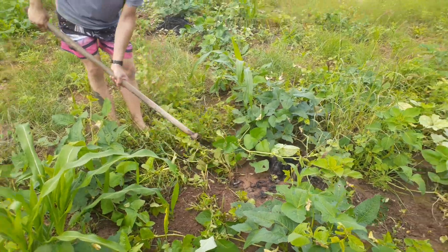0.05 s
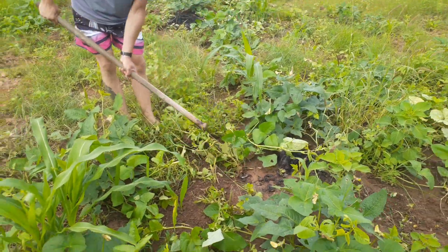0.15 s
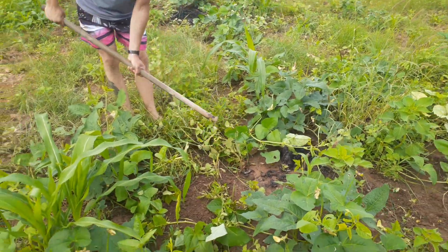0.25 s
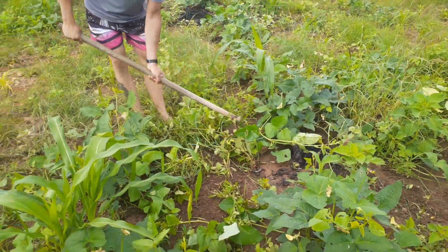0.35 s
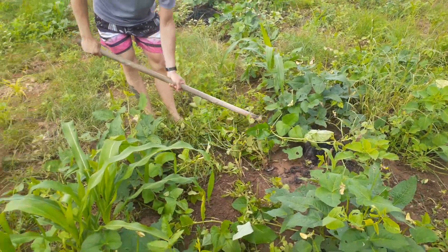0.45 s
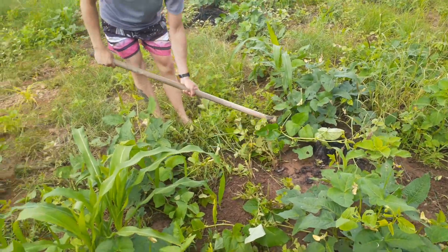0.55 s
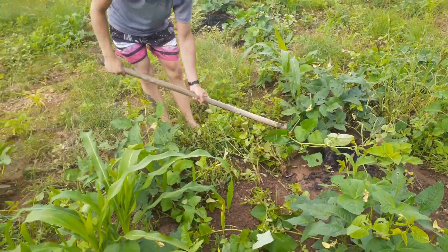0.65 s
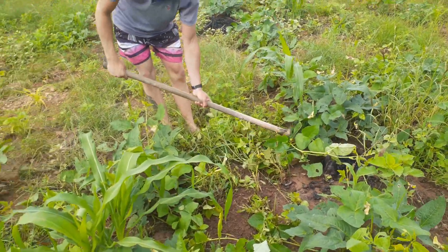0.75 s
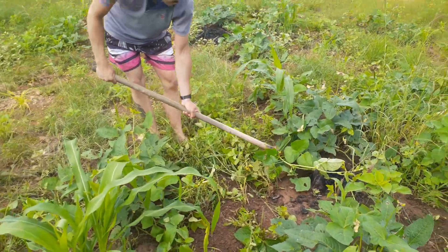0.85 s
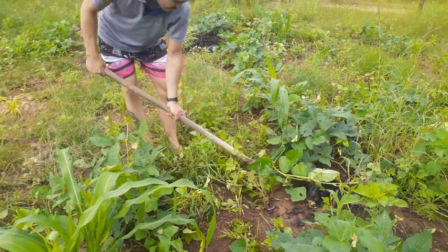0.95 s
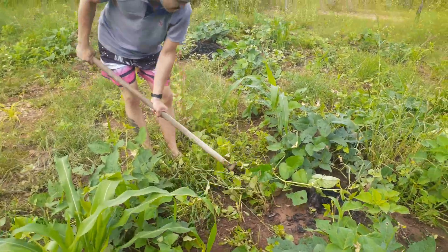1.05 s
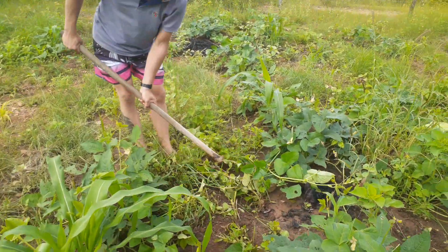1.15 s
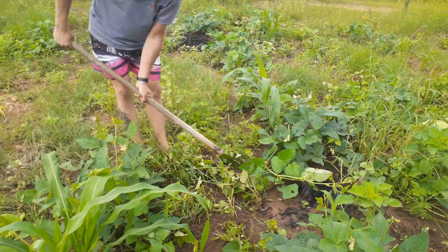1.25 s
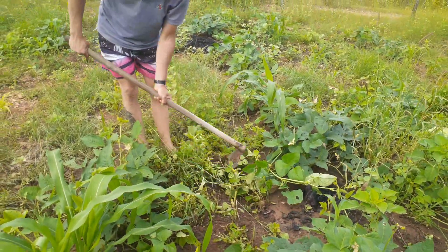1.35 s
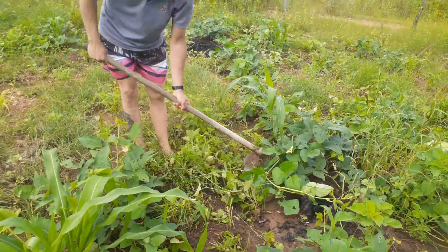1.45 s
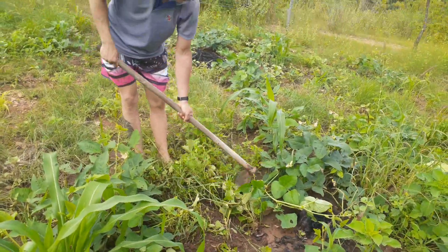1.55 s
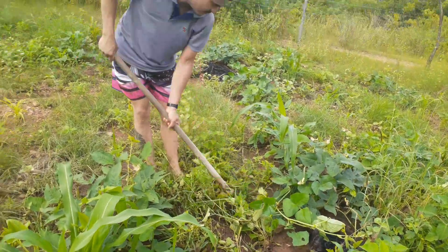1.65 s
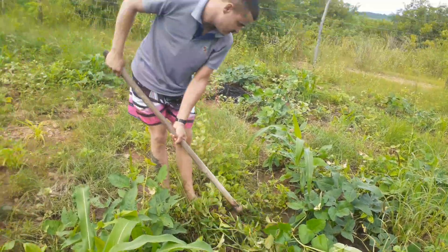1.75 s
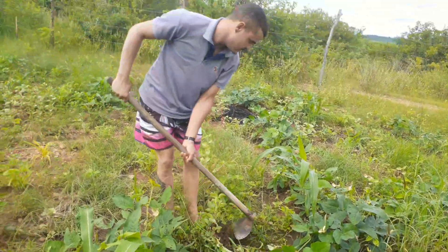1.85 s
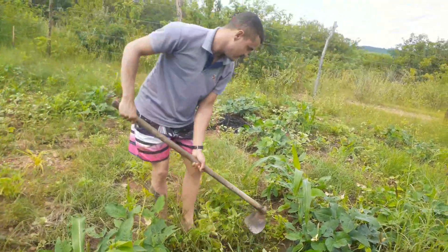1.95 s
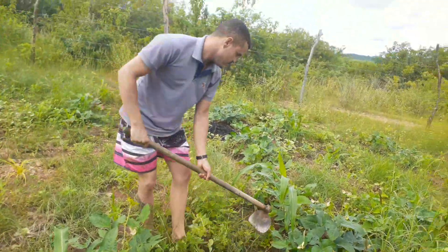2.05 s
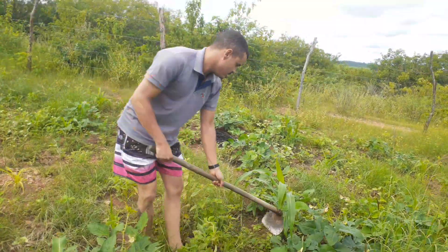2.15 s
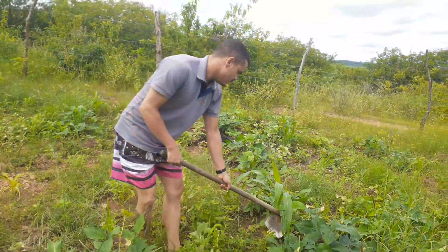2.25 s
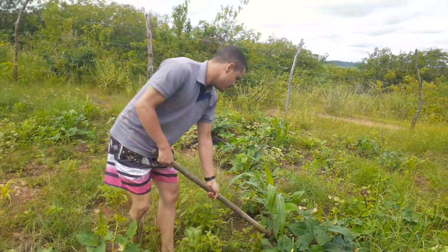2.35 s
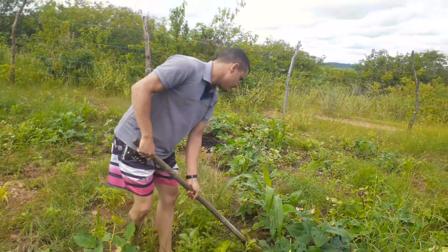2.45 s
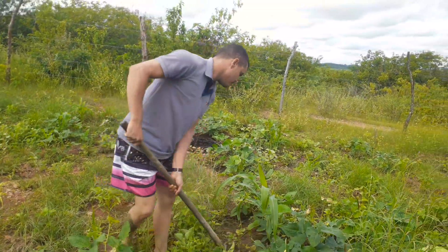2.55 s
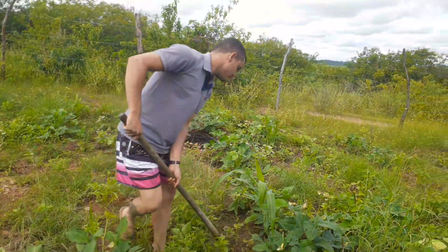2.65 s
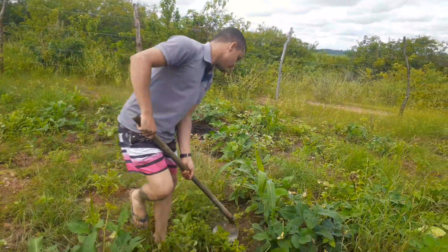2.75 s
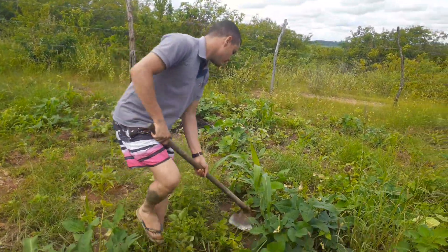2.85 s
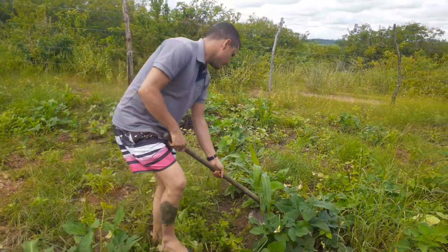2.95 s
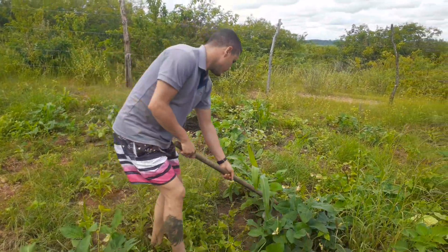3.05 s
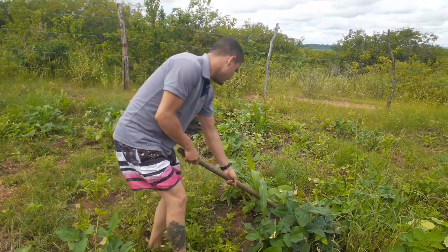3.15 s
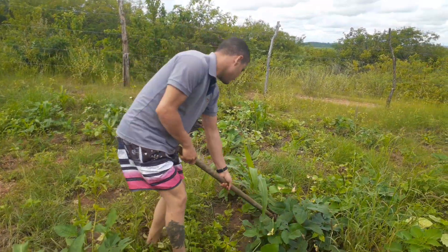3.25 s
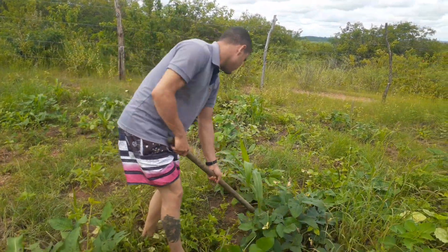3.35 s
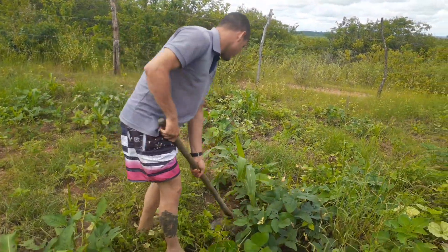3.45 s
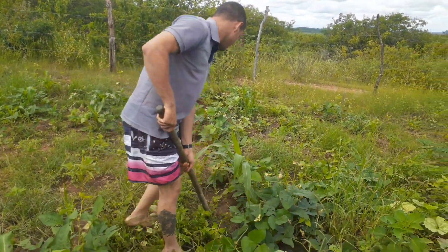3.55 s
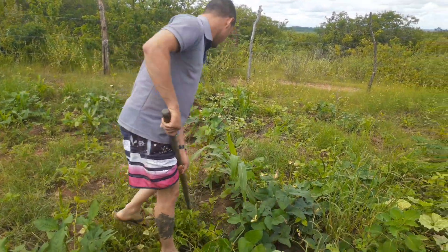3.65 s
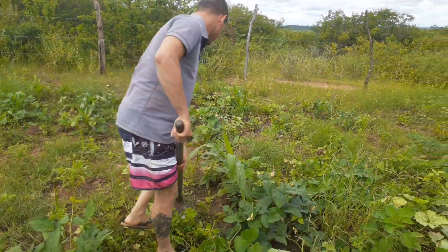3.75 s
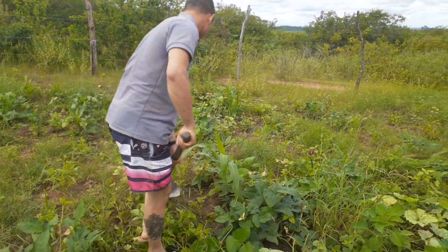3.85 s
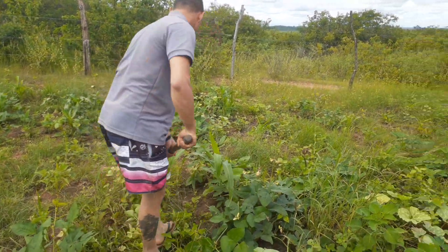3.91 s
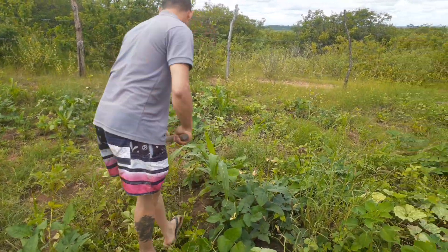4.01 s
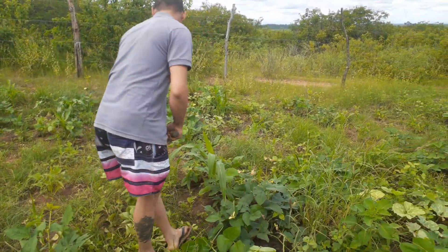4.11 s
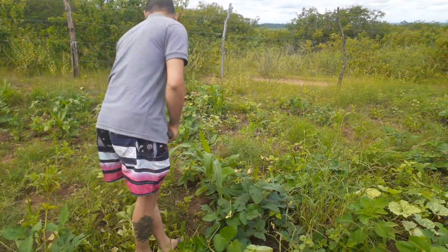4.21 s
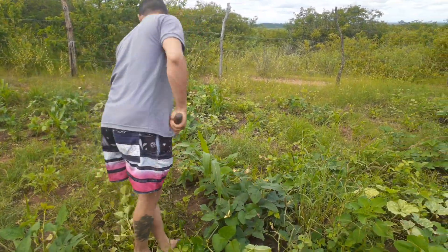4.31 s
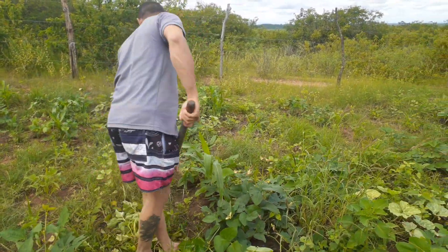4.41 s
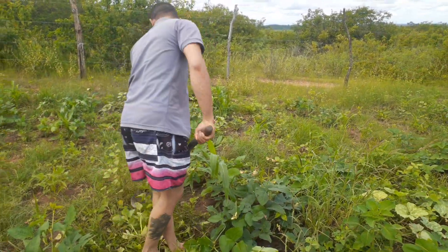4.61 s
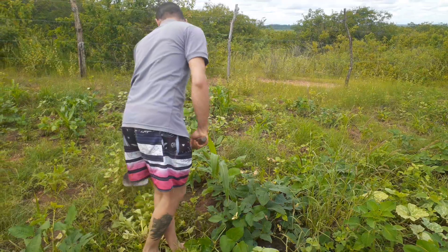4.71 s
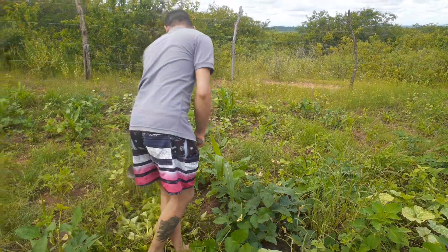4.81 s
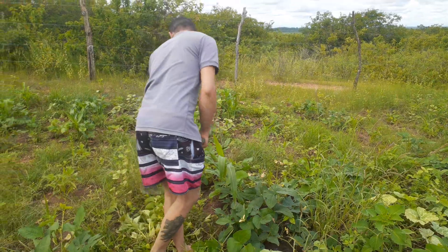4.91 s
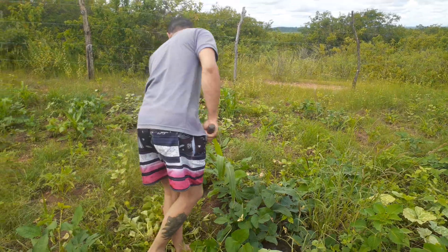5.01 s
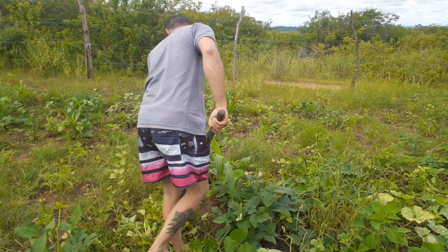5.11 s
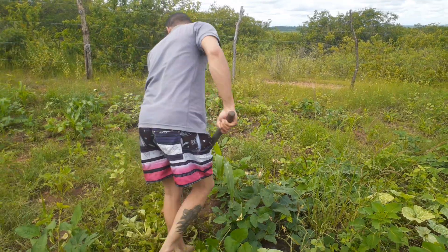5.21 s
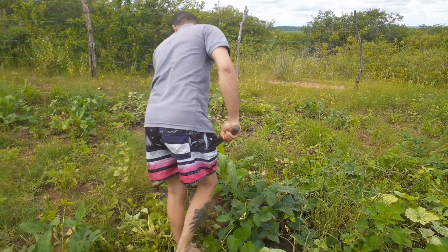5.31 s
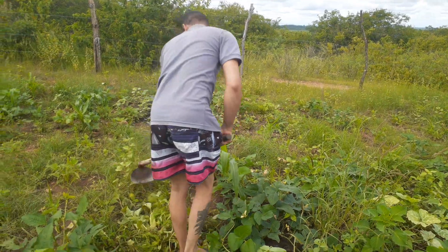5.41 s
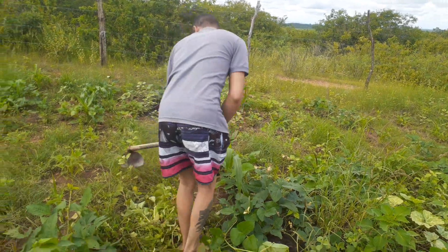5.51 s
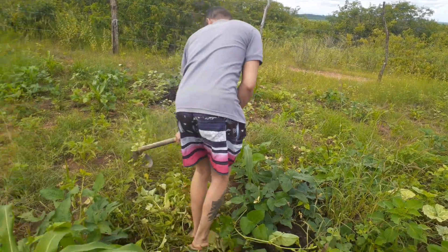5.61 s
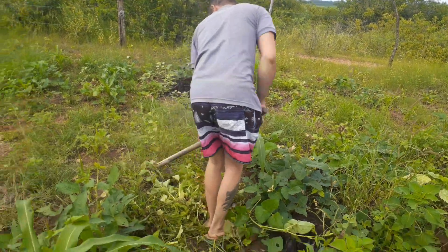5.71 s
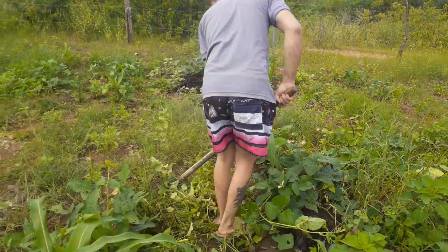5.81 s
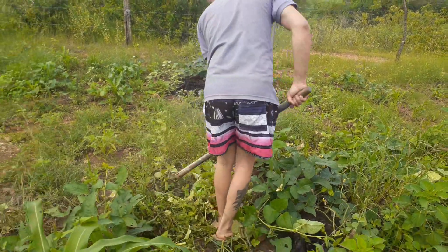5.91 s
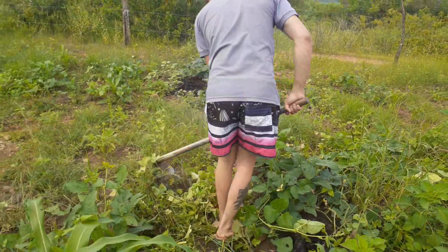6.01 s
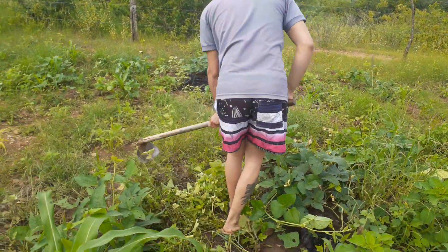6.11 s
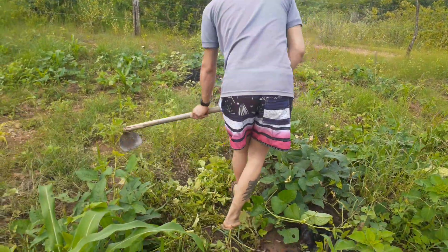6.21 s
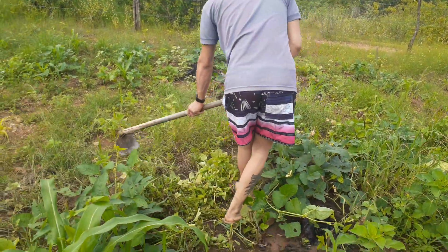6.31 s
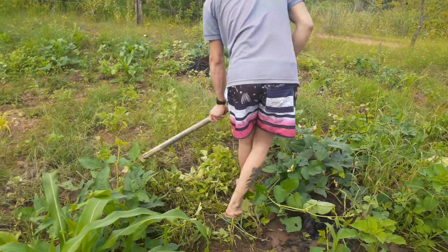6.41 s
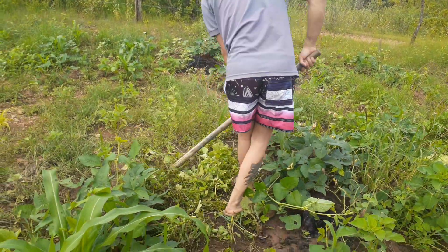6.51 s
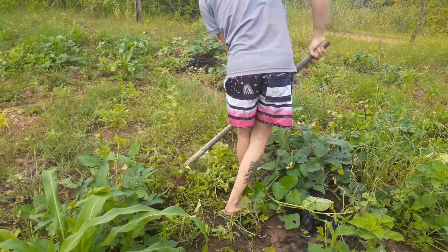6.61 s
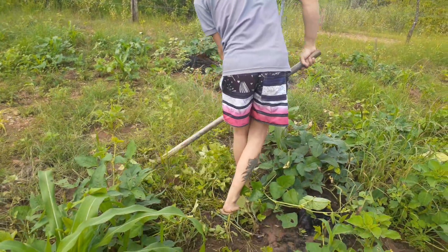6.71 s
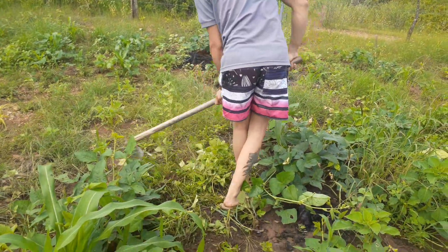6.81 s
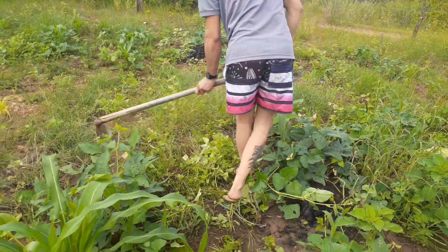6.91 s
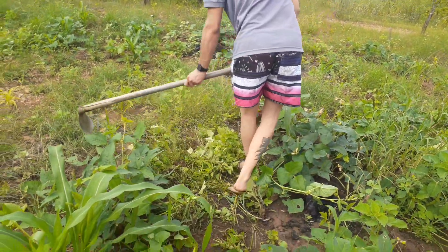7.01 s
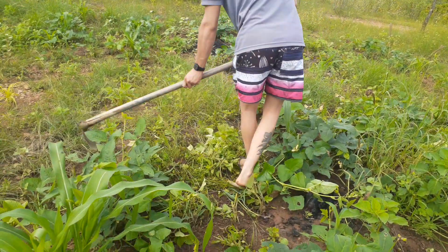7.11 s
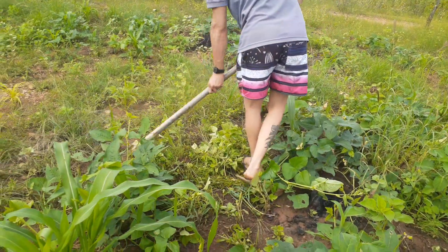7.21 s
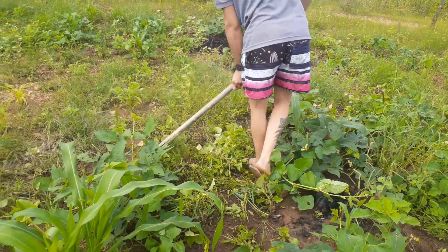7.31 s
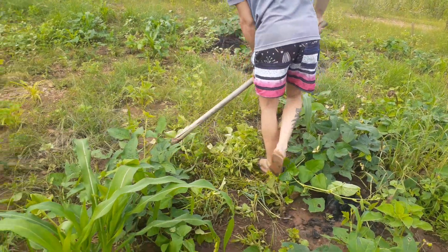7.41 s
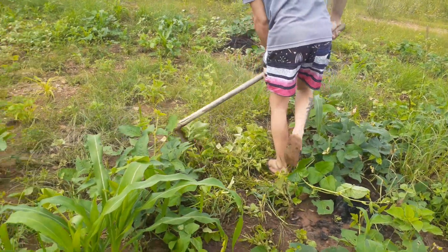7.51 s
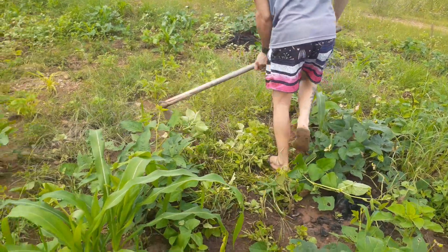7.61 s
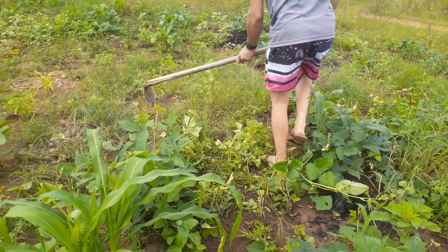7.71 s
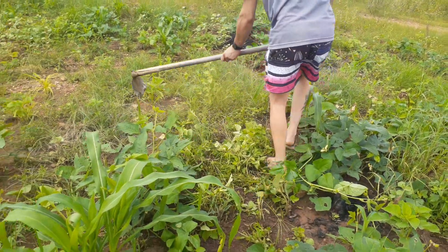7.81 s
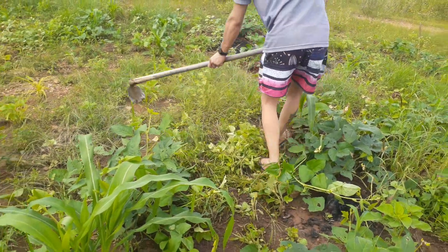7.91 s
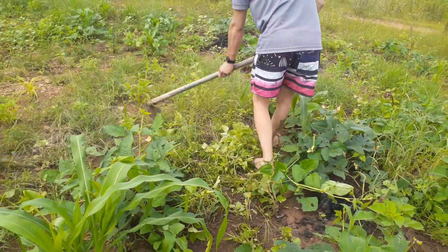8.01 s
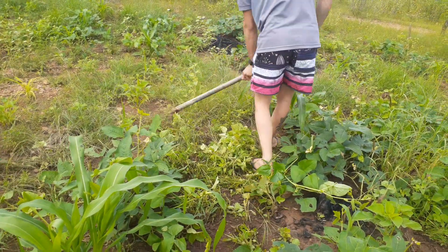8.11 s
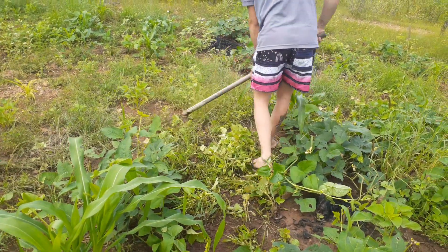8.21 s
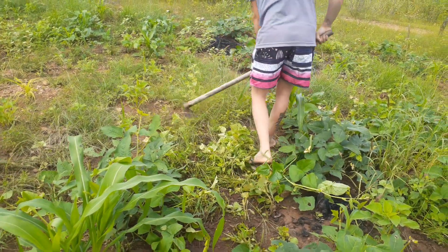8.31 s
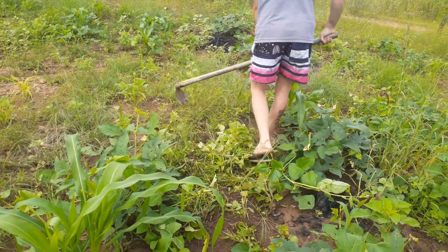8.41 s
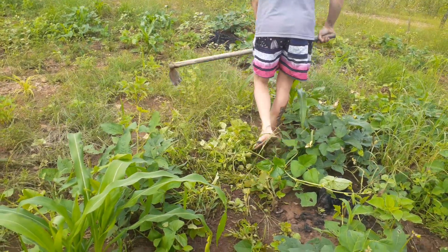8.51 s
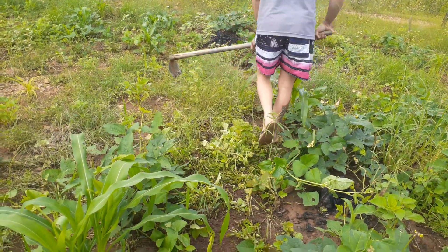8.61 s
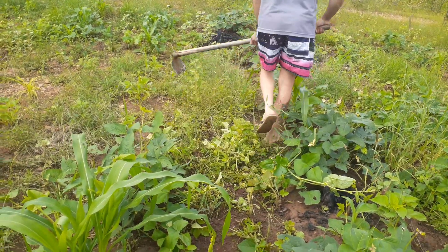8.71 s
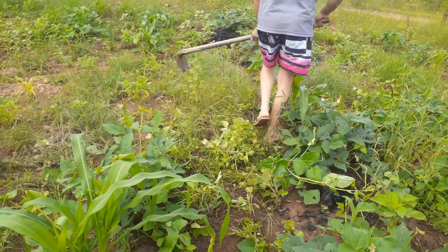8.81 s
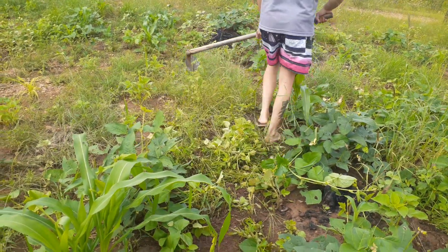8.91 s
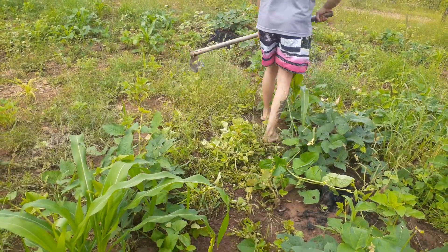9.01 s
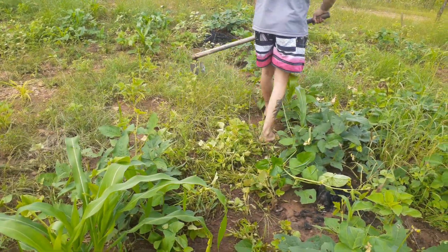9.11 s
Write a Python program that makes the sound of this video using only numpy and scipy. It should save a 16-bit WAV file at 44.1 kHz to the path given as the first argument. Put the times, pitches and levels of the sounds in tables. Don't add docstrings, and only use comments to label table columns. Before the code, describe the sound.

A steel hoe chops gritty soil and weeds in uneven blows, with blade ring, handle knocks, rustling leaves and faint distant birds outdoors.

```python
import sys
import numpy as np
from scipy import signal
from scipy.io import wavfile
from scipy.ndimage import uniform_filter1d

SR = 44100
rng = np.random.default_rng(int(sys.argv[2]) if len(sys.argv) > 2 else 0)


def elevation(decibels):
    levels = np.asarray(decibels, float)
    return 10 ** (levels / 20)


def to_wav(s):
    ch = np.atleast_2d(s).T
    pcm = np.round(np.clip(ch, -1, 1) * 32767)
    wavfile.write(sys.argv[1], SR, pcm.astype(np.int16))


N = 403515

# (frequency [Hz], level [dB])
GRIT_COLOUR = [(800, -34), (1800, -17), (2600, -2), (4000, 1.5), (6000, 3.5), (9000, -1.5), (15800, 6.5),
               (17000, -15.5)]
SWELL_EDGE_DB = -4


def evened(x):
    return x / np.sqrt(np.mean(x ** 2) + 1e-20)


def peaked(x):
    return x / np.sqrt(uniform_filter1d(x ** 2, 130).max() + 1e-20)


def add(mix, start_s, sound):
    part = mix[max(round(start_s * SR), 0):][:len(sound)]
    part += sound[:len(part)]


def coloured(x, hz, db):
    grid_hz = abs(np.fft.fftfreq(4096, 1 / SR))
    log_gain = np.interp(np.log(grid_hz + 1), np.log(hz), db) * np.log(10) / 20
    taps = np.fft.ifft(np.exp(np.conj(signal.hilbert(log_gain)))).real[:2048]
    return signal.oaconvolve(x, taps)[:len(x)]


def ring(x, hz, t60):
    r = np.exp(-np.log(1000) / (t60 * SR))
    turn = 2 * np.pi * hz / SR
    return signal.lfilter([np.sin(turn)], [1, -2 * r * np.cos(turn), r * r], x)


def grains(size, spread_db):
    strength = elevation(spread_db * np.minimum(rng.exponential(1, size), 4))
    return evened(rng.standard_normal(size) * strength)


def patchy(x, depth_db):
    hz, t, z = signal.stft(x, nperseg=512, noverlap=384)
    across_hz = uniform_filter1d(rng.standard_normal(z.shape), 5, -2)
    patches = evened(uniform_filter1d(across_hz, 28, -1))
    swelling = signal.istft(z * elevation(depth_db * patches), nperseg=512, noverlap=384)[1]
    return evened(swelling[..., :N])


def ground(x):
    taps = np.zeros((2, 700))
    at = rng.integers(6, 700, (2, 24))
    echoes = rng.choice([-1., 1.], at.shape) * elevation(-13 - 60 * at / SR / 0.061)
    np.put_along_axis(taps, at, echoes, 1)
    taps = signal.lfilter(*signal.butter(2, 1700, "high", fs=SR), taps)
    taps[:, 0] = 1
    return signal.oaconvolve(x[None], taps, axes=1)[:, :len(x)]


def hiss():
    # (frequency [Hz], left level [dB per Hz], right level [dB per Hz])
    densities = [(28, -108, -118), (77, -91.5, -108), (395, -105, -110), (980, -115, -117),
                 (3000, -120, -121), (6800, -128, -121), (8513, -141, -132), (9040, -116, -127),
                 (10300, -112, -125), (10800, -119, -123), (12900, -117, -121), (13300, -107, -121),
                 (16100, -110, -121), (15600, -150, -155)]
    # (time [s], level [dB])
    wind = [(0.1, -76), (0.3, -77), (1.4, -81.5), (1.8, -71), (2.25, -86.5), (2.66, -76), (2.88, -85.5),
            (4.56, -81), (4.71, -86), (5.76, -74), (5.99, -83), (6.46, -76), (6.59, -82), (7.44, -82),
            (7.84, -84.5), (9.1, -88.5)]
    hz, *ports_db = np.transpose(densities)
    out = np.array([coloured(rng.standard_normal(N), hz, db) * np.sqrt(SR / 2) for db in ports_db])
    low = signal.lfilter(*signal.butter(2, 250, fs=SR), out)
    lumps = elevation(3.5 * evened(uniform_filter1d(rng.standard_normal((2, N)), 3000)) + 7.5)
    wind_db = np.interp(np.arange(N) / SR, *np.transpose(wind))
    lumps = lumps * elevation(.8 * (wind_db + 74.5))
    return out + low * (lumps - 1)


def whine():
    # (frequency [Hz], rms level [dB])
    lines = [
        (4762, -100),
        (9524, -67.5),
        (14287, -63),
    ]
    drift = evened(uniform_filter1d(rng.standard_normal((2, N)), 1500))
    turn = 2 * np.pi * np.cumsum(1 + 0.00051 * drift[0]) / SR
    return sum(elevation(db + 3 + .6 * drift[1]) * np.sin(hz * turn) for hz, db in lines)


def bumps():
    # (time [s], peak level [dB], frequency [Hz])
    gusts = [
        (0.147, -47.5, 81.5),
        (0.271, -66.5, 97),
        (0.385, -59.5, 103),
        (0.699, -56.5, 83),
        (1.878, -53, 129),
        (4.563, -54.5, 111),
        (5.35, -56, 91.5),
        (7.017, -60.5, 94),
    ]
    # (peak level [dB], frequency [Hz], decay [s])
    dying_gust = (-31, 53, 0.011)
    out, t, rise_s = np.zeros(N), np.arange(3500) / SR, .007
    for s, db, hz in gusts:
        swing = np.sin(2 * np.pi * hz * (t + 0.007 * (1 - np.exp(-t / 0.0013))))
        push = (t / rise_s) * np.exp(1 - t / rise_s)
        add(out, s + 0.00676, elevation(db + 10.5) * swing * push)
    db, hz, decay_s = dying_gust
    add(out, 0, -elevation(db) * np.cos(2 * np.pi * hz * t) * np.exp(-t / decay_s))
    return out


def birds():
    # (start [s], end [s], from [Hz], to [Hz], level [dB])
    trill = [
        (0., .016, 3020, 3330, -0.5),
        (.014, .022, 3300, 4250, -5),
        (.021, .031, 4200, 3000, -2),
        (.034, .046, 2950, 2700, 0),
        (.043, .058, 2750, 2250, 0),
    ]
    chip = [
        (0., .01, 3330, 3150, -2),
        (.007, .024, 3200, 2650, 0),
    ]
    rise = [
        (0., .014, 2850, 2760, -3),
        (.01, .034, 2760, 3080, 0),
    ]
    pip = [
        (0., .013, 5780, 5450, 0),
    ]
    # (time [s], level [dB])
    trills = [(4.521, -62), (4.607, -63.5), (4.691, -65), (4.773, -65.5), (4.856, -65.5), (4.941, -63.5)]
    endings = [(4.111, -73.5), (4.236, -72.5), (5.194, -56.5), (5.278, -59.5), (5.36, -60.5)]
    chips = [(0., -74), (.113, -72), (.233, -74), (.35, -71), (.463, -73), (6.595, -70), (6.71, -67),
             (6.826, -67), (6.942, -67)]
    rises = [(.035, -74), (.415, -68), (6.897, -70)]
    pips = [(.268, -78), (.314, -75), (.43, -80), (.472, -78), (.592, -79), (4.64, -67)]
    song = ((trill, trills), (trill[-2:], endings), (chip, chips), (rise, rises), (pip, pips))
    out = np.zeros(N)
    for strokes, times in song:
        for s, db in times:
            for t0, t1, from_hz, to_hz, stroke_db in strokes:
                hz = np.linspace(from_hz, to_hz, round((t1 - t0) * SR)) * rng.uniform(.985, 1.015)
                fade = np.hanning(len(hz)) ** .7
                level = elevation(db + stroke_db + 4.5 + rng.normal(0, 1.5))
                add(out, s + t0, level * fade * np.sin(2 * np.pi * np.cumsum(hz) / SR))
    bushes = rng.standard_normal(5000) * elevation(-35 - 60 * np.arange(5000) / SR / .15)
    bushes[0] = 1
    return signal.oaconvolve(out, bushes)[:N]


def sweeps():
    # (middle [s], half length [s], rms level [dB], frequency [Hz])
    swings = [
        (1.331, 0.22, -70.5, 375.5),
        (3.108, 0.071, -74.5, 405),
        (3.933, 0.13, -71.5, 421.6),
        (5.483, 0.12, -73.5, 426.6),
        (6.234, 0.093, -66, 412.3),
        (8.581, 0.14, -77, 417.4),
    ]
    blur_hz, arch = 70, 0.32
    out, t = np.zeros(N), np.arange(-SR // 2, SR // 2) / SR
    r = np.exp(-2 * np.pi * blur_hz / SR)
    for middle, half, db, hz in swings:
        air = signal.lfilter([1], [1, -2 * r, r * r], [1, 1j] @ rng.standard_normal((2, len(t))))
        away = (t / half) ** 2
        glide_hz = hz * (1 - arch * np.minimum(away, 2) / 2)
        turn = np.exp(2j * np.pi * np.cumsum(glide_hz) / SR)
        add(out, middle - .5, evened((air * turn).real) * elevation(db + SWELL_EDGE_DB * away))
    return out


def ticks():
    # (time [s], level [dB])
    snaps = [
        (.041, -58),
        (0.623, -64),
        (2.809, -58),
        (3.214, -49),
        (5.445, -41.5),
        (6.205, -50.5),
        (6.99, -58.5),
        (7.755, -64.5),
        (7.845, -67),
    ]
    out, t = np.zeros(N), np.arange(300) / SR
    for s, db in snaps:
        snap = rng.standard_normal(len(t)) * elevation(-60 * t / 0.0062)
        add(out, s, elevation(db) * peaked(coloured(snap, *np.transpose(GRIT_COLOUR))))
    return out


def rattles():
    # (start [s], length [s], frequency [Hz], rms level [dB])
    rubs = [(.33, .06, 4450, -77), (.365, .03, 5450, -73), (.405, .04, 4450, -70), (.4, .06, 3480, -71),
            (.525, .03, 2620, -75), (.615, .012, 1900, -78), (.5, .06, 3100, -84), (.54, .1, 5600, -86),
            (.33, .1, 5700, -76), (.37, .05, 6100, -78), (.9, .015, 350, -66), (1.28, .15, 2360, -82),
            (1.25, .2, 1660, -84), (1.27, .17, 1780, -84), (1.24, .18, 2100, -84), (1.3, .15, 1920, -85),
            (1.04, .015, 4300, -60), (4.17, .05, 3200, -74), (4.36, .05, 2690, -56), (5.96, .05, 5700, -68),
            (5.96, .06, 4950, -73), (6.21, .05, 3680, -70), (6.21, .03, 6100, -70), (6.5, .05, 3680, -56),
            (6.76, .025, 5450, -67), (6.85, .05, 3480, -71), (8.19, .11, 3500, -66), (8.26, .05, 3750, -72),
            (8.52, .05, 4450, -82), (1.615, .045, 2690, -63), (2.55, .09, 2690, -66),
            (2.86, .06, 3850, -72), (2.9, .11, 1290, -69), (3.3, .16, 950, -66), (3.48, .16, 1120, -62),
            (5.61, .05, 5100, -74), (5.955, .04, 3480, -68), (6.205, .06, 3500, -68), (6.21, .1, 4950, -68),
            (6.225, .08, 5700, -69),
            (6.47, .08, 2690, -54), (6.74, .04, 5700, -64), (6.74, .08, 4450, -67),
              (6.835, .07, 5700, -63), (6.85, .05, 4450, -70), (6.85, .05, 3600, -70),
              (.88, .12, 3750, -66), (.92, .06, 3000, -69), (.92, .06, 5600, -68), (.91, .06, 4050, -70),
              (.44, .07, 4950, -79), (.28, .05, 3900, -77), (.3, .05, 4950, -76), (8.23, .03, 4100, -70),
              (8.235, .03, 5900, -70), (8.15, .14, 2700, -66), (8.26, .09, 2700, -79),
              (8.33, .1, 2700, -83), (8.3, .15, 3480, -82), (8.44, .18, 3500, -80), (8.39, .09, 4920, -84),
              (8.525, .04, 5600, -80), (7.28, .07, 850, -64), (.29, .03, 2100, -78), (9.03, .12, 3480, -85)]
    out = np.zeros(N)
    for s, length_s, hz, db in rubs:
        size = round(length_s * SR)
        fade = signal.windows.tukey(size, .4) * elevation(np.linspace(3, -6, size))
        patter = np.append(grains(size, 3.0) * fade, np.zeros(3000))
        shorter = min(hz / 2700, 1)
        sung = ring(ring(patter, hz, t60=.036 * shorter), hz, t60=.005 * shorter)
        add(out, s, elevation(db) * sung / np.std(sung[:size]))
    return out


def blade(x, damping):
    # (frequency [Hz], level [dB], t60 [s])
    modes = [(1755, -6, .3), (2090, -9, .35), (2690, 1, .22), (3300, -4, .2), (3490, 2, .3),
             (3680, -2, .25), (3850, -1, .2), (4455, 1, .3), (4945, 3, .3), (5300, -4, .15), (5480, -4, .2),
             (5700, 1, .4), (6250, -5, .1)]
    return sum(elevation(db) * ring(x, hz, t60 * damping) / np.sqrt(t60) for hz, db, t60 in modes)


def motion():
    # (start [s], hold [s], grit level [dB], loose soil [dB re grit])
    ploughs = [(0.0, 0.062, -61, -5), (1.01, 0.065, -52, -5), (1.073, 0.084, -60.5, 2),
               (1.648, 0.012, -47, -8), (1.69, 0.051, -55.5, 2), (2.459, 0.0099, -38.5, -6.5),
               (2.532, 0.076, -54, -6), (3.303, 0.018, -53.5, 2), (3.37, 0.079, -59.5, -0.5),
               (3.485, .15, -53.5, -5.5), (4.335, 0.11, -41.5, -6.5), (5.034, 0.013, -39, -4),
               (5.112, 0.024, -46.5, 3), (5.712, .015, -42, -10), (5.742, 0.058, -51, -3.5),
               (5.839, 0.0095, -40, -5.5), (6.467, 0.032, -39.5, -6), (6.513, 0.025, -44, -10),
               (7.271, 0.008, -45.5, -4), (7.336, 0.13, -64.5, -10), (7.7, 0.17, -63.5, -14.5),
               (7.285, 0.035, -59, 5), (8.113, 0.085, -53, -3), (8.228, .018, -55.5, -16)]
    # (middle [s], half length [s], grit level [dB], loose soil [dB re grit])
    rustles = [(0.375, 0.17, -68, -10), (.62, 0.21, -76.5, -1), (0.96, 0.055, -54.5, -10),
               (1.44, 0.1, -69.5, -7), (1.904, 0.074, -67.5, -9), (2.118, 0.077, -61, -13),
               (2.296, .09, -73, -12), (2.685, 0.14, -68.5, -19), (3.03, 0.1, -55.5, -16),
               (3.803, 0.19, -67.5, -14), (3.995, 0.065, -61.5, -19.5), (4.195, .12, -64, -25),
               (4.707, 0.3, -67, -33), (5.375, 0.1, -55, -14), (5.65, 0.039, -64.5, -18.5),
               (6.033, 0.099, -61.5, -14.5), (6.223, 0.08, -68.5, -11), (6.372, .07, -73, -10),
               (6.777, 0.1, -59, -20), (7.021, 0.076, -76, -2.5), (7.55, 0.12, -70.5, -12),
               (8.003, 0.16, -78, -4.5), (8.45, 0.12, -71.5, -14), (9.122, .1, -70.5, -7)]
    enter_db_per_s, leave_db_per_s, soil_leaves_faster = 596.5, 213, 1.2
    ring_share, entry_share, entry_s = .31, .3, .04
    t = np.arange(0, N + 64, 64)[:, None] / SR
    start, hold, grit_db, soil_db = np.transpose(ploughs)
    enter = enter_db_per_s * np.maximum(start - t, 0)
    leave = leave_db_per_s * np.maximum(t - start - hold, 0)
    middle, half, leaf_db, crumb_db = np.transpose(rustles)
    swell_db = leaf_db + SWELL_EDGE_DB * ((t - middle) / half) ** 2
    plough_soil_db = grit_db + soil_db - enter - soil_leaves_faster * leave
    grit = elevation(np.hstack([grit_db - enter - leave, swell_db]))
    soil = elevation(np.hstack([plough_soil_db, swell_db + crumb_db]))
    share = ring_share + entry_share * np.exp(-((t - start) / entry_s) ** 2).max(1)
    curves = np.linalg.norm(grit, axis=1), np.linalg.norm(soil, axis=1), np.clip(share, 0, .95)
    return [np.interp(np.arange(N) / SR, t[:, 0], curve) for curve in curves]


def drag():
    # (frequency [Hz], level [dB])
    soil_colour = [(60, -11.5), (150, -2.5), (350, -5), (700, -11), (1200, -13), (1800, -16), (3000, -29)]
    grit, loose, share = motion()
    flutter = elevation(2.4 * evened(uniform_filter1d(rng.standard_normal((2, N)), 350)))
    level = flutter[0] * grit * elevation(4.5)
    leaves = [evened(coloured(grains(N, 1.5), *np.transpose(GRIT_COLOUR))) for _ in range(3)]
    leaves = patchy(np.array(leaves), depth_db=2.4)
    leaves = 0.66 * leaves[0] + 0.83 * leaves[1:]
    unit = np.std(blade(grains(SR, 1.5), damping=.33))
    rung = blade(grains(N, 2.5) * level * share, damping=.33) / unit
    soil = evened(coloured(grains(N, 1.3), *np.transpose(soil_colour)))
    soil = soil * flutter[1] * loose * elevation(-0.5)
    near = elevation(-6.0) * rung + soil + rattles() + ticks() + sweeps()
    return leaves * level * np.sqrt(1 - share ** 2) + ground(near)


def clangs():
    # (time [s], frequency [Hz], peak level [dB], t60 [s])
    struck = [(1.123, 3520, -40, .018), (1.124, 750, -41, .09), (6.4512, 762, -20.5, .065),
              (7.252, 1180, -42, .03), (7.256, 6900, -30, .03), (6.52, 2690, -43, .07),
              (7.256, 4450, -34, .06), (1.659, 5120, -36, .018), (1.659, 2704, -34, .05),
              (2.462, 750, -34.5, .05), (2.462, 1766, -30, .045), (2.465, 2676, -25, .05),
              (2.463, 5394, -31, .03), (4.351, 4540, -17, .022), (4.349, 4870, -13.5, .025),
              (4.348, 1710, -36, .04), (4.349, 6190, -20, .016), (4.409, 3830, -31, .04),
              (4.35, 1050, -27, .045), (4.447, 1050, -40, .05), (2.437, 360, -37, .045),
              (2.462, 360, -35, .05), (4.408, 4580, -25, .03), (4.447, 4550, -36.5, .04),
              (5.105, 734, -32.5, .06), (5.105, 3900, -26, .035), (5.106, 4640, -21.5, 0.034),
              (5.113, 1038, -37, 0.11), (5.041, 1103, -40.5, .08), (5.105, 4947, -27, .05),
              (5.106, 5560, -34, .05), (5.144, 2830, -35, .02), (5.859, 1040, -33, .04),
              (6.451, 1764, -28, .045), (6.453, 2640, -30, .09), (6.451, 3510, -22, .04),
              (6.452, 5100, -31.5, .06), (6.472, 4980, -31.5, .05), (8.128, 2748, -31, .025),
              (8.128, 4830, -37, .015)]
    out, t = np.zeros((2, N)), np.arange(3000) / SR
    for s, hz, db, t60 in struck:
        strike = grains(len(t), 3.0) * elevation(-60 * t / .012)
        clang = peaked(ring(ring(strike, hz, t60), hz, t60=max(.003, 9 / hz)))
        for port, heard in zip(out, ground(elevation(db) * clang)):
            add(port, s, heard)
    return out


def blows():
    # (frequency [Hz], level [dB])
    crunch_colour = [(150, -30), (600, -16.5), (1000, -6), (1500, -3), (2100, -4), (3000, 0.5), (4800, 2),
                     (6400, 1.5), (9000, 3.5), (12000, -3), (15500, 5.5)]
    # (time [s], crunch peak [dB], knock [dB re crunch], knock [Hz])
    bites = [(1.1223, -22.5, -3, 727), (1.6591, -24, -19, 1120), (1.742, -27, -6.5, 1050),
             (2.4364, -12.5, -17.5, 940), (2.4606, -16, -6, 1160), (2.4693, -13.5, -4, 1130),
             (3.2965, -25.5, -6, 1270), (3.3358, -43, 4, 910), (3.347, -48, 4, 950),
             (3.5606, -22.5, -14, 1162), (3.528, -39, -6, 1000), (3.545, -43, 1, 1150),
             (4.3486, -3, -13, 1033), (4.4088, -11, -10, 1060), (4.4473, -22.5, -9.5, 1063),
             (5.0278, -19.5, -10.5, 990), (5.8592, -24.5, -1, 1110), (5.878, -34, -7, 1200),
             (2.428, -36, -15, 960), (5.1050, -11, -6, 1100), (5.2396, -40.5, -12, 1228),
             (5.8685, -17, -10, 740), (5.9607, -44.5, -25.5, 720), (6.4373, -35, -21, 1360),
             (6.4722, -22, -22.5, 859), (7.7013, -53, -26.5, 1230), (8.112, -35.5, -10.5, 1020),
             (8.158, -33.5, -15, 910), (0.9655, -36, -16, 1050), (5.063, -24, -10, 1100),
             (7.2585, -27, -20, 1100), (7.298, -36, -4, 1100), (8.138, -33, -12, 1000),
             (8.203, -38, -20, 900), (8.2415, -40, -34, 926), (8.27, -53, -32, 926)]
    # (time [s], crunch peak [dB], knock [dB re crunch], knock [Hz])
    thumps = [(0.9226, -50.5, -7, 774), (1.6895, -34, -8, 1000), (1.697, -37, -5, 820),
              (1.0935, -41.5, -7, 747), (4.344, -21, -4, 1146), (4.4217, -24, -12.5, 1120),
              (5.019, -29.5, -5, 1275), (5.0629, -28, -5.5, 1096), (5.1425, -22, -5.5, 1263),
              (5.7059, -28, -18, 1190), (5.8631, -23, -6, 1332), (5.716, -36.5, -18, 900),
              (5.039, -30.5, -7, 1120)]
    # (time [s], crunch peak [dB], knock [dB re crunch], knock [Hz])
    tears = [(1.0174, -33, -22, 760), (1.041, -36, -16, 780), (2.4874, -28, -14, 1234),
             (2.8954, -50.5, -32.5, 1290), (3.2826, -23.5, -10, 1208), (5.8295, -34, -21, 1146),
             (6.4495, -13, -14, 1030), (6.5176, -31, -13.5, 820), (7.2505, -24, -19, 1175),
             (7.2894, -35, -8, 1023), (7.3394, -49, -7, 885), (8.1916, -37, -24, 835)]
    # (time [s], crunch peak [dB], knock [dB re crunch], knock [Hz])
    taps = [(8.1274, -16, -15, 920), (3.3692, -37, 1.5, 885), (3.387, -44, 5.5, 910),
            (3.4155, -43, -2, 1120), (3.4865, -35, -5, 1090), (3.6214, -46, 5.5, 1069),
            (3.613, -53, 3, 1100), (5.028, -22, -13, 990), (5.7324, -27, 2.5, 1010),
            (5.7553, -28, -1.5, 1000), (5.8466, -24, 0, 950)]
    # (blows, thud [dB re crunch], t60 [s], brightness [dB per dB of strength], rise [s])
    kinds = [(bites, -14, .03, .3, .0007), (thumps, -1., 0.065, 0.31, .0018),
             (tears, -16.5, 0.085, .03, .001), (taps, -13, .01, .2, .0004)]
    out, t = np.zeros((2, N)), np.arange(4800) / SR
    hz, colour_db = np.transpose(crunch_colour)
    bright_band = np.exp(-(np.log(hz / 5800) / 0.34) ** 2)
    for events, thud_db, t60, brightness, rise_s in kinds:
        for s, db, knock_db, knock_hz in events:
            shape = elevation(-60 * t / t60) + 1.8 * elevation(-60 * t / .009)
            burst = grains(len(t), 3.8) * (1 - np.exp(-t / rise_s)) * shape
            bright_db = brightness * (db + 21.0) * bright_band
            crunch = peaked(coloured(burst, hz, colour_db + bright_db))
            steel = peaked(blade(burst, damping=0.11))
            thud = ring(burst, 340, t60=.022) + .5 * ring(burst, 230, t60=.015)
            thud = peaked(thud + .6 * ring(burst, 430, t60=.022))
            knock = ring(burst * elevation(-60 * t / .02), knock_hz, t60=.75 * t60)
            knock = peaked(ring(knock, knock_hz, t60=.004))
            parts = 2.33 * crunch + 0.39 * steel + elevation(thud_db) * thud + elevation(knock_db) * knock
            for port, heard in zip(out, ground(elevation(db - 8.0) * parts)):
                add(port, s, heard)
    return out


def scene():
    # (frequency [Hz], left level [dB], right level [dB])
    port_colours = [(27.5, -24, -27), (136, -2.5, -8.5), (1020, 3.5, .5), (2330, -3, -2),
                    (3640, -6.5, -1.5), (4230, -14.5, -0.5), (6070, -22, -1), (6814, -23, -7),
                    (8220, -30.5, -25), (10000, -16, -15), (11300, -9.5, -14.5), (14000, -19.5, -17.5),
                    (14900, -16, -28), (16300, -11, -26)]
    hz, *ports_db = np.transpose(port_colours)
    field = blows() + clangs() + drag() + birds() * elevation([[-8], [3]])
    heard = np.array([coloured(x, hz, db) for x, db in zip(field, ports_db)])
    return heard + hiss() + bumps() * elevation([[0], [-28]]) + whine() * elevation([[0], [-34]])


def roll_off(x):
    return signal.sosfilt(signal.butter(12, 16820, fs=SR, output="sos"), x)


def record(dry):
    edge = signal.firwin(1201, 15820, window=("kaiser", 6), fs=SR)
    wide_edge = signal.firwin(301, 16600, window=("kaiser", 6), fs=SR)
    limited = signal.oaconvolve(dry, edge[None], "same", axes=1)
    wide = signal.oaconvolve(dry, wide_edge[None], "same", axes=1)
    loud = np.clip(uniform_filter1d(abs(dry), 200) / .03, 0, 1) ** 2
    mix = limited + elevation(-30) * loud * (wide - limited)
    return roll_off(mix)


dry = scene()
out = record(dry)
to_wav(out)
```